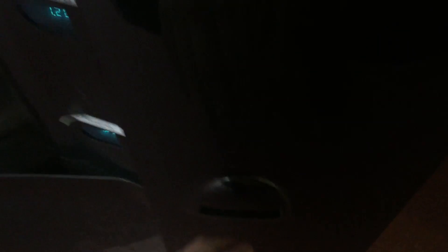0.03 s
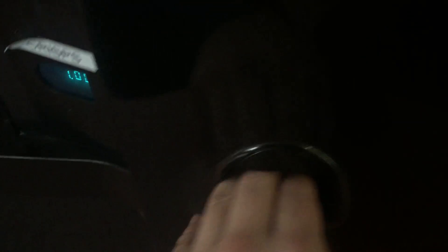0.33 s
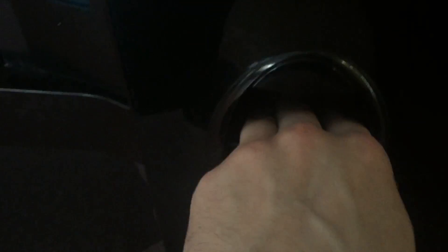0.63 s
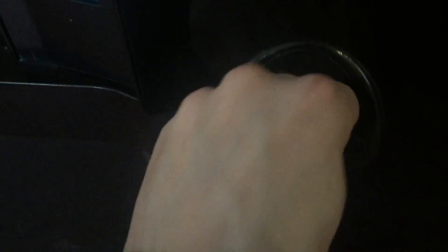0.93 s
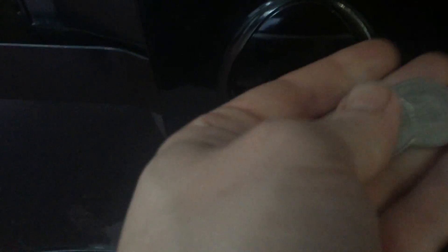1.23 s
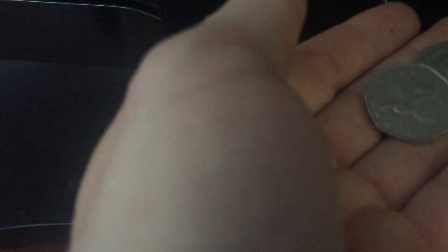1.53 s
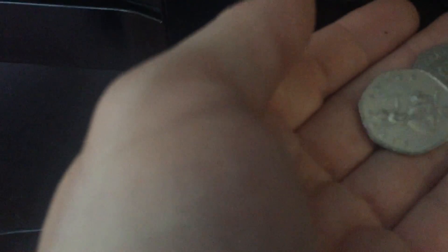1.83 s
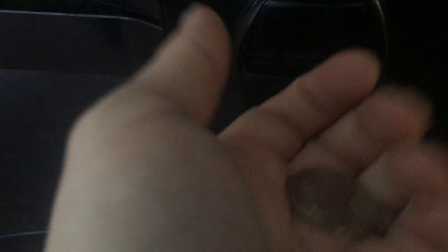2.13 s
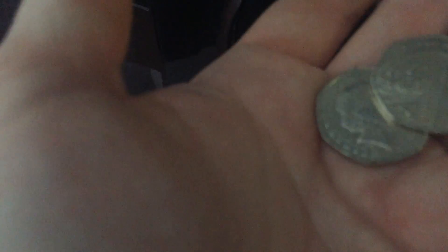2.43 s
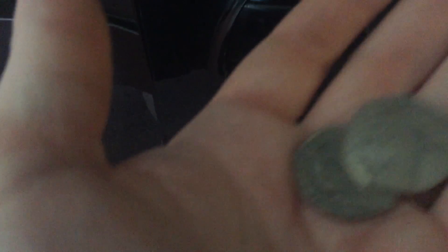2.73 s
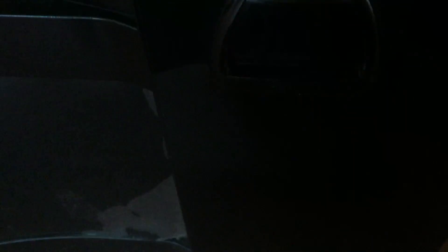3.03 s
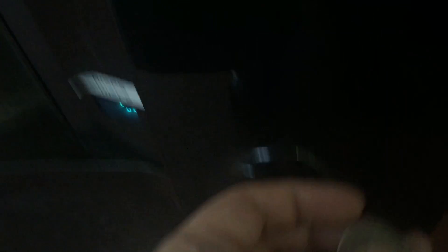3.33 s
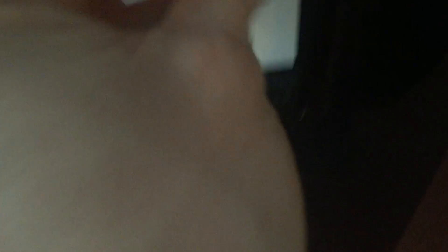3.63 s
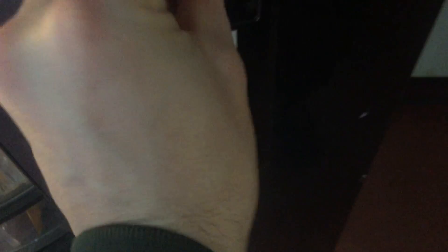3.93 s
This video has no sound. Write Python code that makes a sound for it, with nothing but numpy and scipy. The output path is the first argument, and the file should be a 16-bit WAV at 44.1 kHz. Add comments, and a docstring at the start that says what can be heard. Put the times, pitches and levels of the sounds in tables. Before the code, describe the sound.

Coins rattle down a vending machine's ringing steel chute at the start. The return flap knocks open at 0.4 seconds, coins scrape in the cup, and the flap snaps shut at 1.2. Coins then slide and clink in a palm, close and damped, around 2.2 seconds and most sharply from 3 to 3.5. A light knock comes at 3.9. A low machine hum and faint sleeve rustle lie underneath.

```python
"""Change from a vending machine

Coins rattle down a steel chute and set its panels ringing. A hand knocks the return flap open, scrapes
the coins out of the cup and lets the flap snap shut. The coins slide and clink in the palm, choked by
the skin, and a sleeve rustles. Under it all, the compressor hums and the fan rushes."""
import sys
import numpy as np
from scipy import signal
from scipy.fft import rfft, irfft
from scipy.io import wavfile

SR = 44100
rng = np.random.default_rng(int(sys.argv[2]) if len(sys.argv) > 2 else 0)


def put_to_file(sound):
    """Save the sound as 16-bit audio at rate SR, in the file named by the first command-line argument."""
    columns = np.atleast_2d(sound).T  # one column per channel
    safe = np.clip(columns, -1, 1)
    whole_steps = np.round(safe * 32767)
    wavfile.write(sys.argv[1], SR, whole_steps.astype(np.int16))


N = 176400

# Coins hitting the chute. Each row: start in seconds, level in dB, tilt in dB per octave.
CHUTE_HITS = [(0.0202, -17, 0), (0.0288, -20.5, 2), (0.032, -9, 3), (0.06, -29, 3), (0.0982, -12, -0.5),
              (0.107, -17.5, -3.5), (0.122, -21, 5.5), (0.147, -19, -3), (0.163, -23.5, 1), (0.175, -38, 6),
              (0.203, -15, -2), (0.233, -31, 11)]
# Skittering between the hits. Each row: time in seconds, level in dB.
SKITTER_FADE = [(0.02, -44), (0.06, -38), (0.15, -43), (0.19, -44), (0.235, -39), (0.27, -60)]
# Knocks of the flap. Each row: start in seconds, level in dB, tilt in dB per octave, attack in seconds.
FLAP_KNOCKS = [(0.446, -13, -0.5, 0.00081), (1.1665, -3.5, 3.5, 0.0018), (1.1715, -16.5, -0.5, .0025),
               (3.898, -25.5, -2, 0.00075)]
# Coins and fingertips tapping the cup. Each row: start in seconds, level in dB, tilt in dB per octave.
CUP_TAPS = [(0.4275, -24.5, 0), (0.504, -34.5, 6.5), (0.544, -22.5, 1), (0.625, -31.5, -1),
            (0.683, -31.5, -1), (0.946, -32.5, -5.5), (0.974, -30, -6.5), (1.043, -31.5, 3),
            (1.076, -26, 0.5), (1.09, -35, 1), (3.974, -33, -4.5)]
# Coins dragged over the cup floor. Each row: time in seconds, levels of rasp, hollow and scraping
# resonance in dB, pitch of that resonance in Hz.
CUP_SCRAPE = [(0.67, -58.5, -57.5, -60, 2770), (0.685, -37, -38, -41, 2700),
              (0.715, -37.5, -42.5, -39.5, 2120), (0.733, -32, -34, -27.5, 2460),
              (0.75, -32.5, -36, -40, 2140), (0.772, -36, -45, -35.5, 2530), (0.8, -44, -39.5, -43, 2380),
              (0.845, -57, -48.5, -53.5, 2300), (0.885, -31, -35, -44.5, 2500),
              (0.905, -36.5, -43, -46, 2300), (0.91, -34, -28, -33, 2340), (0.935, -55, -51, -51, 2400),
              (1.02, -58, -60, -59, 2400), (1.06, -39.5, -44, -44.5, 2370),
              (1.13, -55.5, -54.5, -59.5, 2430)]
# The cup's hollow, retuned by the fingers in it. Each row: time in seconds, pitch in Hz.
HOLLOW_PITCH = [(0.75, 1215), (0.8, 1070), (0.87, 1270)]
# Coin on coin. Each row: start in seconds, pitch rise from the grip in Hz, relative ring level in dB,
# ring t60 in seconds, tick level in dB, tick tilt in dB per octave.
COIN_CLINKS = [(0.421, 898, -38, 0.027, -34, 1), (1.076, 300, -28, 0.031, -18, -2.5),
               (1.225, 300, -46, 0.027, -29, -24), (2.022, 100, -37.5, 0.075, -37, 0),
               (2.188, 346, -21, 0.034, -12, 1), (2.199, 300, -43, .02, -21, -2.5),
               (2.2432, 350, -26, 0.034, -15.5, 2.5), (2.378, 183, -44.5, 0.17, -53, 3),
               (2.51, 500, -43, 0.047, -44.5, -2), (2.9617, -20, -7.5, 0.038, -16, 3),
               (2.965, 20, -10, .03, -16.5, -0.5), (2.983, 248, -32, 0.035, -27, -1),
               (3.0273, 204, -23, 0.037, -23.5, -3), (3.124, -5, -16.5, 0.055, -20, 1),
               (3.129, 60, -15, 0.032, -23, 1), (3.201, 100, -33, .04, -39, -1),
               (3.248, 606, -29, 0.05, -22, 3), (3.259, 900, -29, 0.023, -21, 2),
               (3.307, 911, -40, 0.046, -31, 6), (3.3237, 800, -39, 0.018, -18.5, 2),
               (3.431, 500, -26, 0.018, -16, 3.5), (3.436, 118, -16.5, 0.028, -19, -1),
               (3.44, 120, -25, 0.03, -21, -3.5), (3.611, 298, -53, 0.018, -25, -4),
               (3.712, 300, -43, 0.036, -33, -2)]
# Coins clapping flat together. Each row: start in seconds, level in dB.
COIN_CLAPS = [(3.2499, -17), (3.2587, -18.5), (3.267, -39)]
# Coins sliding, one list per move. Each row: time in seconds, levels of rasp, lower ring and upper ring
# in dB, pitch rise from the grip in Hz.
COIN_SLIDES = [
    [(0.0, -45, -45, -46, 100), (0.24, -48, -47, -59, 99.6)],
    [(0.68, -47, -42, -64, 549.5), (0.715, -53, -58, -62, 400), (0.738, -35, -31.5, -38, 199.5),
     (0.8, -64, -80, -75, -1)],
    [(1.18, -32, -67, -67, 299.5), (1.32, -39.5, -60, -54, 399), (1.348, -34, -36.5, -32, 300.5),
     (1.367, -47.5, -61, -49, 299), (1.39, -38, -46, -42, 299), (1.44, -69, -78, -71, 0.5)],
    [(2.054, -55, -56, -60, 200.5), (2.063, -51, -45, -34, 298), (2.078, -47, -48, -43, 98.5),
     (2.1, -40, -33, -34, 52), (2.115, -44, -39, -40, 18), (2.121, -40.5, -22.5, -29, -5),
     (2.135, -41.5, -23, -29, 18), (2.146, -51, -31.5, -35, 198.5), (2.154, -34, -26, -25, 248),
     (2.168, -35.5, -30.5, -22.5, 300.5), (2.186, -56, -66, -40, 201)],
    [(2.25, -44, -39, -45, 452), (2.262, -40, -46, -40, 452), (2.29, -37.5, -38, -41, 398),
     (2.325, -65, -56, -64, 100.8)],
    [(2.86, -74, -82, -72, 902.5), (2.908, -50, -41, -34, 281), (2.922, -82, -51, -56, 200),
     (2.95, -69, -61, -54, 0)],
    [(3.14, -60, -57, -49, -0.5), (3.19, -56, -50, -55, 48), (3.202, -43.5, -44, -46, 100),
     (3.225, -62, -63, -58, 0)],
    [(3.455, -48, -46, -59, 600), (3.473, -54, -32, -62, 752), (3.5, -51, -62, -70, 795)],
]
# A last scuff on the housing, and the sleeve's rustle. Each row: time in seconds, level in dB.
SCUFF_FADE = [(3.89, -54), (3.902, -30), (3.935, -43), (4.0, -63)]
SLEEVE_FADE = [(0, -30), (0.4, -49), (1.1, -49), (1.5, -55), (1.95, -61), (2.8, -78.5), (3.2, -60.5),
               (3.4, -54), (3.6, -44.5), (3.8, -47), (4, -51)]

# Ringing parts. Each row: pitch in Hz, relative level in dB, t60 in seconds.
PANEL_MODES = [(1020, -6, 0.18), (1165, 1.5, 0.21), (1236, -2.5, 0.2), (1510, 1, 0.2), (2097, -8, 0.3),
               (2218, -3, 0.24), (2640, -11.5, 0.33), (3940, -9.5, 0.27)]
FLAP_MODES = [(256, -6, 0.15), (660, 0, 0.09), (825, 0, 0.08), (925, 1, 0.1), (1270, -2, .1),
              (2670, 6.5, .07)]
RIM_MODES = [(831, -4, 0.093), (3070, -1, .04), (3680, -3, 0.04)]
PINCH_MODES = [(10160, -23, .025), (11700, -19, 0.029)]  # coins pinched in the closing hand
# The coins' own pitches in Hz, two lower and three upper.
COIN_HZ = [8500, 8540, 14510, 14635, 15070]
# Their balance. Each row: relative level in dB, share of the ring time.
COIN_BALANCE = [(3.5, 1), (-14, 1), (7, .55), (5, 0.79), (-5, .55)]
# Compressor tones. Each row: pitch in Hz, level in dB.
HUM_TONES = [(100, -52), (125, -56), (225.8, -43.5), (328, -55), (553, -54.5), (698, -55.5)]

# The tone colour of each sound. Each row: frequency in Hz, relative level in dB.
CHUTE_EQ = [(400, -28), (780, -15.5), (1130, -2.5), (1530, -9), (1660, -11.5), (2200, -3.5), (3000, -6),
            (4400, -5), (4950, -20), (6400, -11), (7400, -22.5), (11900, -20.5), (16000, -37.5)]
FLAP_EQ = [(100, -20), (220, -1), (420, -14.5), (650, -1), (900, -1.5), (1250, 0.5), (1650, -10),
           (2700, -1), (4200, -9), (6200, -11.5), (9000, -13.5), (15500, -18)]
CUP_EQ = [(200, -14), (700, 1), (1200, -2), (1700, -4.5), (2400, -4.5), (3500, -2), (4500, -12.5),
          (8500, -19.5), (11000, -27), (15500, -30)]
HOUSING_EQ = [(400, -5), (1100, 1), (1700, 4.5), (2600, -7), (5000, -22.5), (15000, -24.5)]
TICK_EQ = [(1000, -34), (2500, -17), (3500, -9), (5500, -0.5), (7500, -8), (8800, 0), (11700, 0),
           (13500, 0), (15500, 1.5)]
CLAP_EQ = [(2500, -38), (3500, -19), (4200, 3), (4700, 2.5), (5100, -6), (5700, -1.5), (6600, -13),
           (7400, -40)]
LANDING_EQ = [(1500, -40), (2350, -10), (2900, -13.5), (4300, -8), (5500, -49), (6500, 2), (7300, -34)]  # a coin landing on the palm
FLESH_EQ = [(120, -21), (330, 7), (520, -7), (900, -30), (2000, -52)]  # the palm under that coin
SLIP_EQ = [(1500, -29.5), (3500, -5), (4600, -2), (5600, 4), (7000, 1.5), (7700, -10), (8700, -3),
           (10500, -7.5), (13500, -8), (15500, -8.5)]
CLOTH_EQ = [(500, -12.5), (900, -1.5), (1200, -1.5), (2000, -8), (3400, -13), (5500, -17), (8000, -21.5),
            (9400, -21), (16000, -28.5)]
FAN_EQ = [(33, -42.5), (42, -12), (64, -12), (100, -15), (130, -2), (175, -8.5), (222, -2), (262, -13.5),
          (326, -7.5), (460, -21.5), (600, -15.5), (720, -22), (850, -30), (1300, -27.5), (2200, -43.5),
          (4000, -47.5), (8000, -61), (16000, -61.5)]
ROOM_EQ = [(100, 3.5), (2000, -3), (5000, -12.5), (15000, -2.5)]
# How the flap and the room die away. Each row: frequency in Hz, t60 in seconds.
FLAP_DECAY = [(150, 0.19), (800, .11), (2500, 0.054), (6000, 0.035), (15000, 0.023)]
ROOM_DECAY = [(200, 1), (1500, 0.48), (5000, 0.62), (15000, 0.072)]


def chute():
    """Each falling coin cracks on the steel and skitters on; a darker tail and the panels ring out."""
    out = excite(slips(), burst(CHUTE_EQ, t60=0.053)) * fader(SKITTER_FADE)
    for start, db, tilt_db in CHUTE_HITS:
        add(out, start, amp(db) * burst(CHUTE_EQ, t60=0.053, tilt_db=tilt_db))
        add(out, start, amp(db - 20) * burst(CHUTE_EQ, t60=0.62, tilt_db=-4, size=16384))
        add(out, start, amp(db - 12.5) * ring(PANEL_MODES))
    return out


def flap():
    """The hinged flap knocks against its housing and rings briefly."""
    out = np.zeros(N)
    for start, db, tilt_db, attack_s in FLAP_KNOCKS:
        add(out, start, amp(db) * burst(FLAP_EQ, FLAP_DECAY, tilt_db, size=8192, attack_s=attack_s))
        add(out, start, amp(db - 21.5) * ring(FLAP_MODES))
    return out


def cup():
    """Coins scrape and tap in the cup, its resonances moving with the hand; a housing scuff comes last."""
    friction = slips()
    out = colour(friction, CUP_EQ) * fader(CUP_SCRAPE)
    hollow = resonate(friction, curve(HOLLOW_PITCH), width_hz=300)
    scrape = resonate(friction, curve(CUP_SCRAPE, column=4), width_hz=700)
    out += hollow * fader(CUP_SCRAPE, column=2) + scrape * fader(CUP_SCRAPE, column=3)
    out += colour(friction, HOUSING_EQ) * fader(SCUFF_FADE)
    for start, db, tilt_db in CUP_TAPS:
        add(out, start, amp(db) * burst(CUP_EQ, t60=0.071, tilt_db=tilt_db))
        add(out, start, amp(db - 7.5) * ring(RIM_MODES))
    return out


def clinks(pinch_s=3.4365):
    """Coins collide: a tick, a ring choked by the grip and a faint free ring; also claps and a pinch."""
    out = np.zeros(N)
    for start, rise_hz, ring_db, t60, tick_db, tilt_db in COIN_CLINKS:
        choked = ring(coin_modes(rise_hz), time_scale=t60)
        free = ring(coin_modes(0, upper_db=-5.5), time_scale=0.28)
        add(out, start, amp(ring_db) * choked / 2)
        add(out, start, amp(ring_db - 36.5) * free / 2)
        add(out, start, amp(tick_db) * burst(TICK_EQ, t60=0.027, tilt_db=tilt_db, size=2048))
    for start, db in COIN_CLAPS:
        add(out, start, amp(db) * burst(CLAP_EQ, t60=0.034))
    add(out, pinch_s, ring(PINCH_MODES))
    return out


def palm_landing(start_s=2.9615):
    """A coin lands on the palm: a soft thump of flesh under a damped click."""
    out = np.zeros(N)
    add(out, start_s, burst(FLESH_EQ, t60=0.023) + burst(LANDING_EQ, t60=0.042))
    return amp(-23.5) * out


def slides(contacts=8):
    """Coin faces catch at several points, rasping and singing, higher the tighter they are held."""
    friction = slips() * amp(3.5 * np.clip(wander(rate_hz=168), -2, 2))  # slips come in clumps
    contact = rng.integers(0, contacts, N)
    rasp = unit(sum(excite(friction * (contact == k), burst(SLIP_EQ, t60=0.01, size=1024))
                    for k in range(contacts)))
    rise_hz = curve(sum(COIN_SLIDES, []), column=4)
    pitches = [hz for hz, _, _ in coin_modes(rise_hz)]
    lower = squeal(pitches[0])
    upper = unit(squeal(pitches[-2]) + amp(-6) * squeal(pitches[-1]))
    return sum(rasp * fader(move) + lower * fader(move, column=2) + upper * fader(move, column=3)
               for move in COIN_SLIDES)


def coin_modes(rise_hz, upper_db=0):
    """The grip pushes the coins' modes sharp; the upper ones follow only part of the way."""
    modes = [(hz, db, share) for hz, (db, share) in zip(COIN_HZ, COIN_BALANCE)]
    lower = [(hz + rise_hz, db, share) for hz, db, share in modes[:2]]
    upper = [(hz + 0.4 * rise_hz, db + upper_db, share) for hz, db, share in modes[2:]]
    return lower + upper


def squeal(hz, jitter_hz=90, flutter_db=3.5):
    """A mode kept singing by friction, unsteady in pitch and strength."""
    cycles = np.cumsum(hz + jitter_hz * wander(rate_hz=900)) / SR
    flutter = amp(flutter_db * wander(rate_hz=900))
    return unit(flutter * np.sin(2 * np.pi * cycles))


def slips(per_second=1900, spread_db=3.5):
    """The tiny uneven catches of one surface sliding on another."""
    strength = amp(spread_db * np.minimum(rng.exponential(1, N), 4))
    return strength * rng.choice([-1., 1.], N) * (rng.random(N) < per_second / SR)


def sleeve():
    """Cloth rubs as the arm moves: fine grain in a soft hiss."""
    return colour(unit(slips()) + rng.standard_normal(N), CLOTH_EQ) * fader(SLEEVE_FADE)


def machine(waver_depth=0.16, waver_hz=22.15):
    """Compressor tones waver in level and phase over the rush of the fan."""
    t = np.arange(N) / SR
    out = amp(-38.5) * colour(rng.standard_normal(N), FAN_EQ)
    for hz, db in HUM_TONES:
        swell = 1 + waver_depth * wander(waver_hz)
        drift = waver_depth * wander(waver_hz)
        out += amp(db) * np.sqrt(2) * swell * np.sin(2 * np.pi * hz * t + drift)
    return out


def room(direct):
    """The reverb of a small, hard room."""
    tail = burst(ROOM_EQ, ROOM_DECAY, size=24000)
    return signal.fftconvolve(direct, tail / np.linalg.norm(tail))[:N]


def burst(eq, t60, tilt_db=0, size=4096, attack_s=0.00095):
    """Countless close modes struck at once; t60 is one time or a table by frequency."""
    t = np.arange(size) / SR
    noise = np.sign(rng.random(size) - 0.5)
    strike = colour(noise, eq, tilt_db) * np.minimum(t / attack_s, 1)
    if np.isscalar(t60):
        return strike * amp(-60 * t / t60)
    hz, spectrum = np.fft.rfftfreq(size, 1 / SR), rfft(strike)
    out = np.zeros(size)
    for centre_hz, band_t60 in t60:
        band = at_frequency([(f, float(f == centre_hz)) for f, _ in t60], hz)
        out += irfft(spectrum * band, size) * amp(-60 * t / band_t60)
    return out


def ring(modes, time_scale=1):
    """The decaying sines of a struck object; time_scale multiplies their ring times."""
    t = np.arange(0, time_scale * max(t60 for _, _, t60 in modes), 1 / SR)
    return sum(amp(db - 60 * t / (t60 * time_scale)) * np.sin(2 * np.pi * (hz * t + rng.random()))
               for hz, db, t60 in modes)


def excite(clicks, body):
    """Plays clicks through a ringing body, at rms 1."""
    return unit(signal.oaconvolve(clicks, body)[:N])


def resonate(x, hz, width_hz):
    """A resonance that rides a pitch curve, at rms 1."""
    carrier = np.exp(2j * np.pi * np.cumsum(hz) / SR)
    pole = np.exp(-np.pi * width_hz / SR)
    return unit((carrier * signal.lfilter([1], [1, -2 * pole, pole * pole], x / carrier)).real)


def colour(x, eq, tilt_db=0):
    """Applies an EQ curve and a tilt per octave, at rms 1."""
    hz = np.fft.rfftfreq(len(x), 1 / SR)
    gain = amp(at_frequency(eq, hz) + tilt_db * np.log2(hz + 20))
    return unit(irfft(rfft(x) * gain, len(x)))


def at_frequency(points, hz):
    """Reads a table on a log-frequency axis."""
    point_hz, values = np.transpose(points)
    return np.interp(np.log(hz + 1), np.log(point_hz + 1), values)


def fader(points, column=1):
    """Gain from a dB curve, silent beyond its ends."""
    return amp(curve(points, column, outside=-200))


def curve(points, column=1, outside=None):
    """One column of a table as automation across the scene."""
    columns = np.transpose(points)
    return np.interp(np.arange(N) / SR, columns[0], columns[column], left=outside, right=outside)


def wander(rate_hz, size=4000):
    """Random modulation of depth about 1 that turns at the given rate."""
    return np.interp(np.arange(N) / SR * rate_hz, np.arange(size), rng.standard_normal(size))


def add(mix, start_s, sound):
    """Drops a sound into the mix."""
    part = mix[max(round(start_s * SR), 0):][:len(sound)]
    part += sound[:len(part)]


def amp(db):
    """Decibels to gain."""
    return 10 ** (np.asarray(db) / 20)


def unit(x):
    """Scales to rms 1."""
    return x / np.sqrt(np.mean(x ** 2) + 1e-20)


def scene():
    """Coins and flap up front with a little room, sleeve and machine behind, in mono."""
    direct = chute() + flap() + cup() + clinks() + palm_landing() + slides()
    return (direct + amp(-16) * room(direct) + sleeve() + machine())[None]


def record(dry, low_cut_hz=36, high_cut_hz=16000):
    """A low cut, a clip at full scale and a steep high cut."""
    low_cut = signal.butter(4, low_cut_hz, "highpass", fs=SR, output="sos")
    high_cut = signal.firwin(255, high_cut_hz, window=("kaiser", 8), fs=SR)
    clipped = np.clip(signal.sosfilt(low_cut, dry), -1, 1)
    return signal.oaconvolve(clipped, high_cut[None], "same")


dry = scene()
out = record(dry)
put_to_file(out)
```